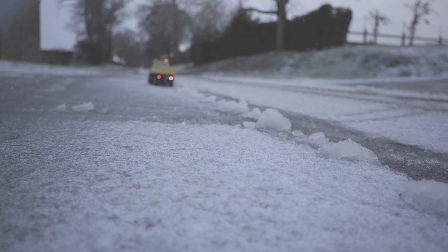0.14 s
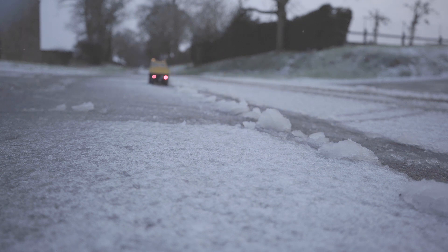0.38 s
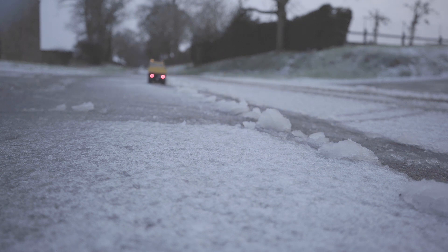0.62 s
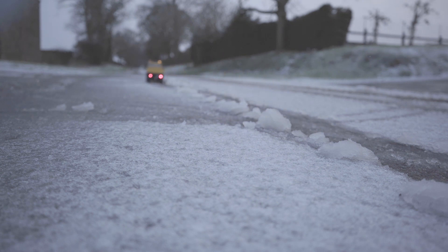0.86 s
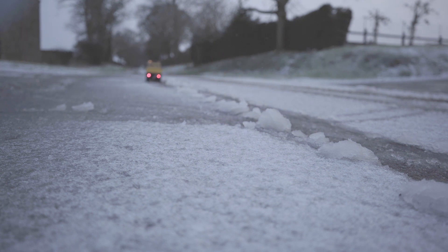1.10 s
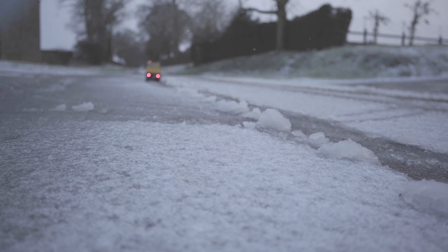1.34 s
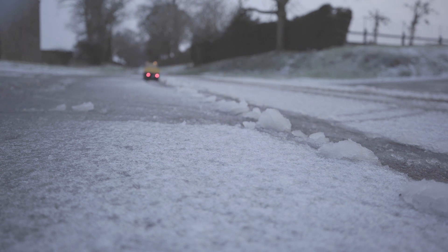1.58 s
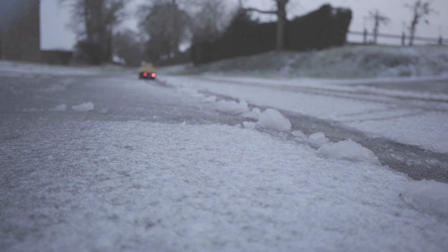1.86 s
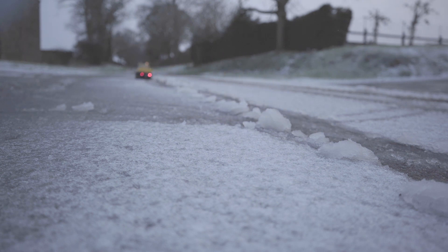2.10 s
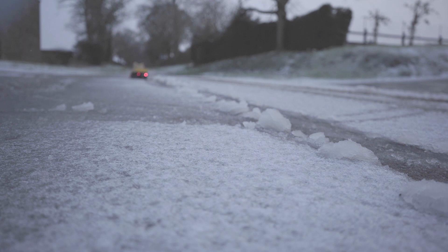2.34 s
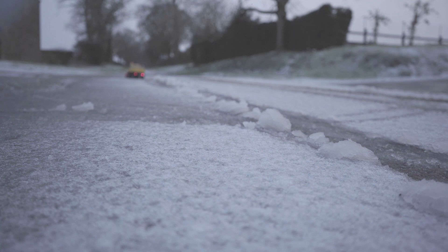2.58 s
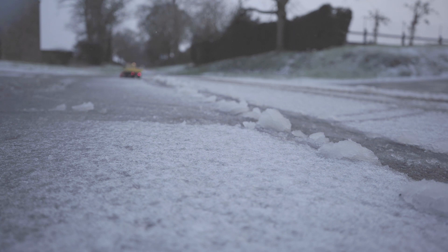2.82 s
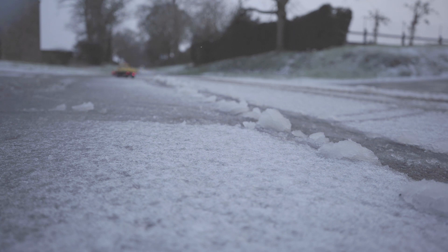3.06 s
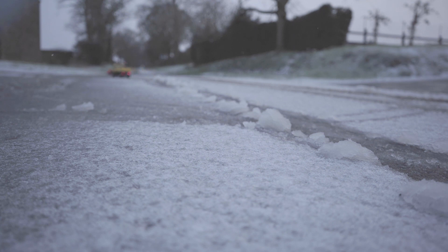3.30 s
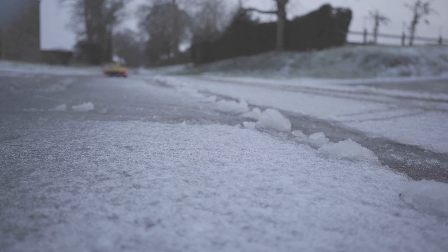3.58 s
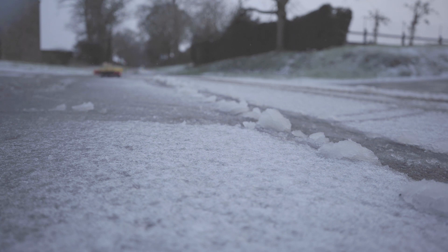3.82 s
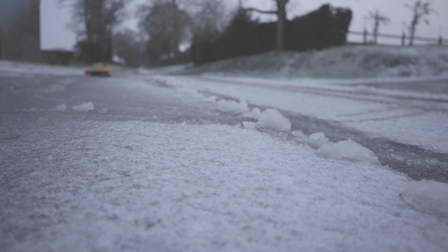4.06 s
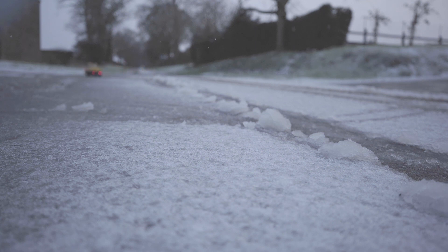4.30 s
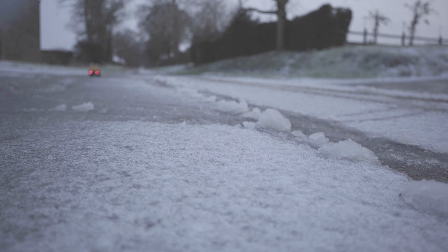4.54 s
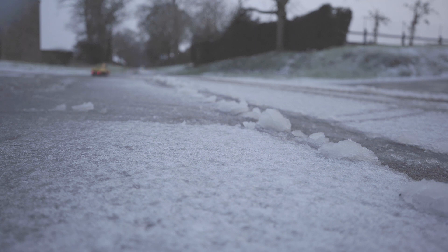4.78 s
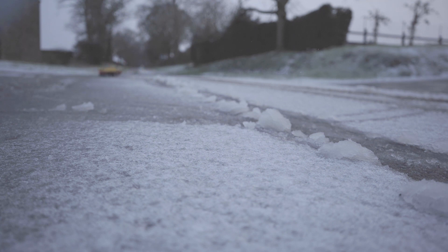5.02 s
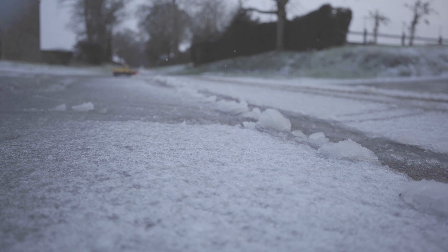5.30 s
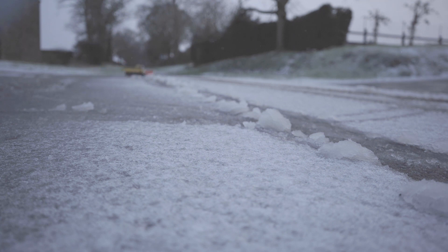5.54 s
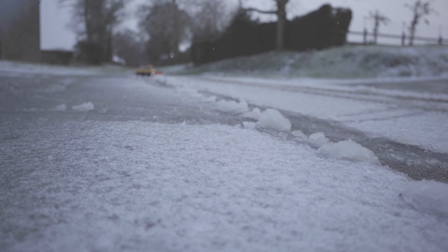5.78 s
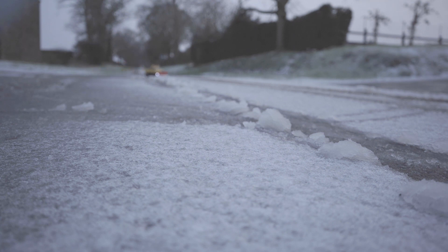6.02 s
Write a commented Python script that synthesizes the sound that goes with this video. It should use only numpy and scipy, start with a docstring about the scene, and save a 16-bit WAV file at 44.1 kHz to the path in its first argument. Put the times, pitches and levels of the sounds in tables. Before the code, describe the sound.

At a snowy roadside, ground-level stereo microphones catch a small electric model truck driving away over a steady, soft hush of distant wind and road. At 0 s its gear whine and grainy plastic rattle are loudest; the tone climbs, briefly drops out near 0.2 s, and hard knocks hit between 0.1 and 0.75 s, with an ice tick at 0.2. From 1 to 2.2 s the whine is high and throbs around twenty times a second, quieter, with a knock at 1.6. Around 2.3 s pitch and level fall sharply, with a knock at 2.4; a short, rough, lower burst follows at 2.7-3.1, with a close tick. Near 3.4 s it almost stops, leaving hiss. From 3.6 s it revs up again, reaching its highest pitch about 4.3-4.6, then whirrs unevenly to 6 s, faint, rattly and metallic, slightly left before drifting right, with sparse ice ticks.

```python
"""A gear whine and plastic rattle: a small electric model truck drives off over crusted snow, brakes, turns
and speeds up again, left of a pair of microphones on the ground. Meshing teeth make a swept tone that throbs once
per shaft turn; grainy noise rings the plastic body, and decaying modes knock as the chassis meets lumps.
Ice grains tick nearby as short noise bursts, over a far hush of wind and road made of coloured noise."""
import sys
import numpy as np
from scipy import signal
from scipy.fft import rfft, irfft, next_fast_len
from scipy.io import wavfile
from scipy.ndimage import uniform_filter1d, map_coordinates

SR = 44100
rng = np.random.default_rng(int(sys.argv[2]) if len(sys.argv) > 2 else 0)


def wav_out(sig):
    """Save sig, one row per channel (or a flat mono array), as 16-bit PCM at SR to the path in sys.argv[1]."""
    wavfile.write(sys.argv[1], SR, np.round(np.clip(np.atleast_2d(sig).T, -1, 1) * 32767).astype(np.int16))


def nominal_scale(level):
    """Amplitude ratio for a level in decibels (scalar or array-like)."""
    x = np.asarray(level, float) / 20
    return 10 ** x


N = 270774

# resonances of the gearbox housing: (centre [Hz], width [Hz], level [dB])
GEARBOX_MODES = [(2720, 180, -5), (2930, 130, 0), (3150, 200, -3), (3380, 220, -5)]
# resonances of the motor can: (centre [Hz], width [Hz], level [dB])
MOTOR_CAN_MODES = [(3480, 200, -4), (3700, 110, -2), (3880, 110, 0), (4110, 130, -1), (4500, 350, -8)]


def along(points, hz):
    """Logarithmic frequency scale: (frequency [Hz], value) points are interpolated on it."""
    f, v = np.transpose(points)
    return np.interp(np.log(hz + 1), np.log(f + 1), v)


def curves(rows):
    """Slow control: each column after the time becomes a piecewise linear curve, one value per sample."""
    s, *columns = np.transpose(rows)
    return [np.interp(np.arange(N) / SR, s, column) for column in columns]


def swells(rows):
    """Superposition of Gaussian bumps (time [s], length between 1/e points [s], height)."""
    t = np.arange(N) / SR
    return sum(height * np.exp(-4 * ((t - s) / length) ** 2) for s, length, height in rows)


def unit(x):
    """Normalization to an rms of 1."""
    return x / np.sqrt(np.mean(x ** 2) + 1e-20)


def wobble(rate):
    """Band-limited fluctuation: a smooth curve through random knots, rate of them a second."""
    knots = rng.standard_normal(int(N * rate / SR) + 4)
    return map_coordinates(knots, [np.arange(N) * rate / SR])


def filtered(x, response):
    """Linear filtering: the spectrum is multiplied by a complex response of frequency."""
    m = next_fast_len(N + 8192)
    return irfft(rfft(x, m) * response(np.fft.rfftfreq(m, 1 / SR)), m)[..., :N]


def modes(table):
    """Modal superposition: damped resonators (centre [Hz], width [Hz], level [dB]) of alternating sign."""
    def response(f):
        total = 0
        for k, (centre, width, db) in enumerate(table):
            damping = 1j * f * width
            total = total + (-1) ** k * nominal_scale(db) * damping / (centre ** 2 - f ** 2 + damping)
        return total
    return response


def pair(a, b, alike):
    """Interchannel coherence: two unrelated sounds, mixed as mid and side to the likeness asked."""
    def weights(hz):
        turn = np.arccos(np.clip(along(alike, hz), 0, 1)) / 2
        return np.array([np.cos(turn), np.sin(turn)])
    mid, side = filtered(np.array([a, b]), weights)
    return np.array([mid + side, mid - side])


def grit(response, grain_db, grain_rate):
    """Amplitude-modulated noise: uneven grains in patches over pitch and time, coloured, stereo, rms 1."""
    # the truck's noise at the two microphones: (frequency [Hz], likeness [0-1])
    truck_alike = [(60, .93), (600, .9), (1400, .9), (2500, .84), (4000, .55), (7000, .44), (15000, .35)]
    grains = nominal_scale(grain_db * wobble(grain_rate)) * rng.standard_normal((2, N))
    z = signal.stft(grains, nperseg=1024)[2]
    patches = uniform_filter1d(rng.standard_normal(z.shape[1:]), size=4, axis=0)
    patches = uniform_filter1d(patches, size=5, axis=1)
    a, b = signal.istft(z * nominal_scale(1.84 * unit(patches)), nperseg=1024)[1][:, :N]
    return unit(filtered(pair(a, b, truck_alike), response))


def hush():
    """Diffuse-field noise: far wind and road, barely moving; a low breeze leans on the microphones."""
    # wind and road: (frequency [Hz], relative density [dB per Hz])
    air_colour = [(120, -47), (200, -21), (380, -12.5), (482, -15.5), (635, -4), (735, -8.5), (916, -9),
                  (1000, -7.5), (1120, -12.5), (5940, -22.5), (7010, -26), (16000, -47)]
    # breeze: (frequency [Hz], relative density [dB per Hz])
    breeze_colour = [(15, -50), (25, -26), (50, -8), (100, -7), (150, 0), (230, -11), (320, -48),
                     (500, -120)]
    # background at the two microphones: (frequency [Hz], likeness [0-1])
    far_alike = [(60, .93), (250, .96), (500, .93), (1500, .75), (3000, .6), (5000, .35), (15000, .15)]
    # gusts: (time [s], length [s], swell [dB])
    gusts = [(2.03, .15, 9), (2.5, 0.48, 4.5), (3.98, .08, 7)]
    air = filtered(pair(*rng.standard_normal((2, N)), far_alike), lambda f: nominal_scale(along(air_colour, f)))
    breeze = filtered(pair(*rng.standard_normal((2, N)), far_alike), lambda f: nominal_scale(along(breeze_colour, f)))
    air_db = -43.5 + 0.8 * wobble(2.5)
    breeze_db = -72 + swells(gusts) + 1.1 * wobble(10)
    return nominal_scale(air_db) * unit(air) + nominal_scale(breeze_db) * unit(breeze)


def ticks():
    """Impulsive fracture: ice grains crack close by, a few ms of bright noise, thinner for small grains."""
    # ice grains: (time [s], level [dB], left over right [dB], thinness [0-1])
    ice_grains = [(0.222, -22, -3, .6), (2.737, -26.5, -18, .5), (2.8065, -35, 3, .9),
                  (3.4491, -43, -12, .3), (4.1199, -30.5, -7, 0.7), (4.3203, -28.5, 11, .5),
                  (5.239, -28.5, -6, 0.5), (5.4091, -32, -12, .6), (5.8711, -34, -4, .4)]
    # colour of the cracks: (frequency [Hz], relative density [dB per Hz])
    ice_colour = [(2500, -60), (4000, -18), (5500, 5), (9900, 0.5), (12000, -8), (15000, -2), (16600, -13),
                  (17500, -60)]
    out, t = np.zeros((2, N + 512)), np.arange(256) / SR
    for s, db, pan_db, thin in ice_grains:
        # noise common to both sides plus noise of each side
        noise = rng.standard_normal(len(t)) + 1.2 * rng.standard_normal((2, len(t)))
        crack = nominal_scale(-60 * t / 0.0059) * noise  # falls 60 dB in 5.9 ms
        crack = crack - np.clip(thin, 0, 1) * np.roll(crack, 1, axis=1)  # differencing weakens the bass
        sides_db = db + np.array([[pan_db / 2], [-pan_db / 2]])
        out[:, round(s * SR):][:, :len(t)] += nominal_scale(sides_db) * crack
    return filtered(out[:, :N], lambda f: nominal_scale(along(ice_colour, f)))


def drive():
    """Gear kinematics: tooth rate, shaft turns, throb, whine and rattle levels as the wheels skip and bite."""
    # speed before any racing: (time [s], gear teeth meeting a second [Hz])
    tooth_rate = [(0, 1985), (.04, 2000), (.1, 2110), (.26, 2280), (.45, 2350), (.65, 2375), (.9, 2420),
                  (1.1, 2480), (1.3, 2420), (1.53, 2320), (1.8, 2420), (2.0, 2520), (2.2, 2560),
                  (2.34, 2300), (2.5, 1530), (2.64, 1340), (2.86, 1580), (2.91, 1740), (2.98, 1770),
                  (3.03, 1870), (3.12, 1740), (3.33, 820), (3.52, 930), (3.65, 970), (3.78, 1500),
                  (3.86, 1780), (3.89, 2030), (3.925, 2060), (4.0, 2310), (4.27, 2710), (4.55, 2740),
                  (4.75, 2610), (5.0, 2610), (5.25, 2450), (5.55, 2620), (5.72, 2510), (5.88, 2720),
                  (6.14, 2600)]
    # depth of the shaft's throb: (time [s], depth [relative])
    throb_depth = [(0, 0.15), (1.3, 1.9), (2.3, 1.6), (2.9, 1), (3.7, 1.25), (5, 1.54), (6.14, 1)]
    # throttle and distance together: (time [s], whine level [dB], body rattle level [dB])
    throttle = [(0, -25, -23), (.13, -39.5, -27.5), (.18, -46, -27.5), (.24, -35, -27.5), (.27, -26, -27.5),
                (.6, -28, -28.5), (1.2, -29, -32), (1.7, -31, -32.5), (2.15, -32, -31.5),
                (2.33, -37, -32.5), (2.41, -59, -34), (2.46, -64, -41.5), (2.62, -50, -40.5),
                (2.72, -41, -34.5), (2.95, -31.5, -33.5), (3.07, -35.5, -35), (3.16, -54, -37.5),
                (3.44, -71.5, -50.5), (3.55, -52, -37.5), (3.64, -42, -36.5), (3.7, -40, -36),
                (3.8, -35, -33.5), (3.97, -33, -35.5), (4.08, -44, -36), (4.6, -38, -36),
                (4.85, -39, -35.5), (5.35, -49, -36.5), (5.66, -40, -34.5), (6.14, -40.5, -34)]
    # the wheels skip over a bump and the drive goes slack: (time [s], length [s], rattle dip [dB])
    skips = [(.045, .03, 6.5), (.2, .04, 1.5), (.3, .015, 1.5), (.665, .03, 4), (.722, 0.018, 4),
             (.818, 0.012, 3), (.965, 0.023, 4), (1.065, 0.034, 5), (1.36, .04, 2.5), (1.555, 0.02, 3),
             (1.65, 0.023, 2.5), (1.82, 0.045, 2), (2.19, 0.029, 2.5), (2.36, 0.026, 3), (2.53, 0.022, 5),
             (2.7, 0.012, 3.5), (2.79, 0.049, 1.5), (2.885, 0.033, 4), (3.01, 0.033, 3), (3.085, 0.027, 2),
             (3.16, .04, 2), (3.31, 0.022, 10), (3.675, 0.038, 3), (3.85, 0.04, 2), (4.04, 0.017, 1.5),
             (4.32, .025, 0), (4.45, 0.019, 5.5), (4.685, 0.036, 4), (4.805, 0.045, 5), (4.895, 0.029, 6),
             (5.06, .04, 2.5), (5.15, .035, 3), (5.5, 0.024, 2), (5.6, 0.02, 1.5), (5.79, 0.12, 1),
             (5.9, .03, 1.5), (5.99, .03, -0.5)]
    # the wheels dig in and load the drive hard: (time [s], rattle swell [dB], whine swell [dB])
    bites = [(.015, -3.5, 2), (.115, 0, 12), (.995, -0.5, 4.5), (1.095, 3, 4), (1.6, 2.5, 1),
             (2.09, -1, 1.5), (2.22, -1.5, 3.5), (2.67, 1.5, 4), (2.75, 1.5, 11.5), (2.835, 2.5, 2),
             (2.96, 0, 5), (3.045, 3.5, 4), (3.28, 3, 0), (3.34, 7, 1), (3.61, 3, 10), (3.725, 4, 6.5),
             (3.78, 1.5, 9), (3.9, 2, 5.5), (3.98, 0.5, 0.5), (4.66, 0, 4), (4.76, 1.5, 6.5),
             (4.865, 3.5, 10.5), (4.96, 2.5, 8), (5.03, 2, 1), (5.11, 1, 1), (5.19, 2.5, 2), (5.29, 1.5, 1),
             (5.4, 1, -4), (5.555, 0.5, -3), (5.67, -1, 4), (5.845, 0.5, 4), (5.94, -1.5, 5),
             (6.03, 0, 7.5)]
    bite_s = 0.029
    teeth_per_turn, first_turn = 120, -0.07  # of the slightly bent drive shaft
    hz, = curves(tooth_rate)
    throb, = curves(throb_depth)
    turns = np.cumsum(hz) / SR / teeth_per_turn + first_turn
    whine_db, body_db = curves(throttle)
    skip_db = swells(skips)
    # the whine dips deeper than the rattle
    whine_db = whine_db - 2.4 * skip_db + swells([(s, bite_s, db) for s, _, db in bites])
    body_db = body_db - skip_db + swells([(s, bite_s, db) for s, db, _ in bites])
    # freed wheels race ahead 12 ms late, more at speed, then are dragged back
    t = np.arange(SR // 4) / SR - 0.012
    drag = (t > 0) * np.exp(-t / 0.022)
    late_skip = signal.fftconvolve(skip_db, drag / drag.sum())[:N]
    race = 0.013 * np.clip(hz / 2400, 0, 1) ** 2 * late_skip
    race = race - uniform_filter1d(race, size=SR // 6)  # keeps the mean speed
    return hz * (1 + race), turns, throb, whine_db, body_db


def knocks():
    """Impact excitation of modes: each lump strikes the chassis, which chatters back twice within 10 ms."""
    # chassis modes: (frequency [Hz], level [dB], 60 dB decay time [s])
    chassis_modes = [(567, -7.5, 0.017), (823, -2.5, 0.013), (1345, 0.5, 0.011), (1715, -5.5, 0.016),
                     (2160, -1, 0.0083), (3300, -14, .004)]
    # lumps struck: (time [s], level [dB])
    lumps = [(0.1111, -7), (0.2779, -9.5), (0.317, -8.5), (.354, -10.5), (0.5406, -2), (0.7425, -5.5),
             (1.28, -17), (1.613, -8), (1.843, -15.5), (2.4113, -6.5), (3.29, -32), (3.33, -34),
             (3.36, -32), (5.108, -31)]
    contacts = [(0, 0), (0.0032, -14), (0.006, -6.5)]  # (delay [s], level [dB])
    out, t = np.zeros(N + 2048), np.arange(1024) / SR
    for (s, db), chance in zip(lumps, rng.standard_normal((len(lumps), 9))):
        ring = 0
        for (hz, mode_db, t60), c in zip(chassis_modes, chance):
            ring = ring + nominal_scale(mode_db + 0.32 * c - 60 * t / t60) * np.sin(2 * np.pi * hz * t)
        ring = ring * np.clip(t / 0.0011, 0, 1)  # the snow cushions the contact
        for (late, less_db), c in zip(contacts, chance[6:]):
            start = round((s + late * (1 + 0.086 * c)) * SR)
            out[start:start + len(t)] += nominal_scale(db + less_db) * ring
    return filtered(out[:N], modes([(1360, 800, 0)]))


def rattle(load, body_db):
    """Noise-excited resonance: loose gear play rings the plastic and metal; tyres crunch and throw spray."""
    # plastic body: (centre [Hz], width [Hz], level [dB])
    body_modes = [(460, 171, -7), (636, 540, -9), (982, 357, -6.5), (1296, 211, -2), (1805, 545, -4),
                  (2540, 406, -2.5)]
    # hollow cab: (centre [Hz], width [Hz], level [dB])
    cab_modes = [(1480, 90, 0), (1660, 90, -2)]
    # crunch of the crust: (frequency [Hz], relative density [dB per Hz])
    crunch_colour = [(2530, -56), (4300, -5), (5010, 2), (5300, -0.5), (7410, -2), (8350, -7.5),
                     (9500, -14), (12400, -24), (20900, -120)]
    # thrown crystals: (frequency [Hz], relative density [dB per Hz])
    spray_colour = [(5290, -37), (9000, 2), (12500, 4), (13600, -1), (15850, -1), (16100, -30)]
    # as the truck turns different sides to the listener, levels over the body:
    # (time [s], cab [dB], gearbox [dB], motor can [dB], tyres [dB], spray [dB])
    facing = [(0, -7, -8, -6, -10, -17.5), (.5, -3.5, -3.5, -3.5, -8.5, -17), (1.2, -2, -2, -4, -7.5, -14),
              (2.3, -6.5, -4.5, -3.5, -10.5, -17), (2.6, -7, -7.5, -7, -13, -25),
              (2.8, 2, -1, -5, -13, -23), (3.05, -11.5, -1, -5, -9, -21), (3.4, -23, -6, -9.5, -16.5, -26),
              (3.75, -10, -2, -4, -12, -27), (4.1, -9, -0.5, 5.5, -4, -16.5), (4.45, 0, -4, -4, -6, -19),
              (4.65, -2, -2.5, -2.5, -6, -20), (4.75, 5.5, -3.5, -2.5, -6, -20),
              (4.9, -4.5, -4, -4.5, -8.5, -20), (5.1, -1, -1, -0.5, -7, -20.5),
              (5.25, -7.5, 3.5, 3, -9.5, -22), (5.42, -7, 0.5, 6, -10.5, -21.5),
              (5.6, -14, -4.5, 3, -11, -22), (6.14, -10, -2, -8.5, -16, -20)]

    def ringing(part, centre, width):
        """Cascaded resonance: the part's modes under one broad resonance (centre [Hz], width [Hz])."""
        return lambda f: modes(part)(f) * modes([(centre, width, 0)])(f)

    cab_db, gearbox_db, can_db, tyres_db, spray_db = body_db + np.array(curves(facing))
    shake_db = 0.76 * load + 0.43 * wobble(28)  # small bumps shake all parts together
    snow_shake_db = 0.88 * shake_db
    body = nominal_scale(body_db + shake_db) * grit(ringing(body_modes, 1400, 2500), 0.77, 250)
    cab = nominal_scale(cab_db + shake_db) * grit(ringing(cab_modes, 1560, 700), 1.3, 200)
    gearbox = nominal_scale(gearbox_db + shake_db) * grit(ringing(GEARBOX_MODES, 2950, 1500), 2.0, 300)
    can = nominal_scale(can_db + shake_db) * grit(ringing(MOTOR_CAN_MODES, 3900, 1500), 2.75, 300)
    tyres = nominal_scale(tyres_db + snow_shake_db) * grit(lambda f: nominal_scale(along(crunch_colour, f)), 1.04, 400)
    spray = nominal_scale(spray_db + snow_shake_db) * grit(lambda f: nominal_scale(along(spray_colour, f)), 1.8, 400)
    return body + cab + gearbox + can + tyres + spray


def whine(hz, turns, throb, tone_db, load):
    """Gear-mesh tone, modulated: once per shaft turn it jumps ahead, loses contact a moment and sags again."""
    angle = 2 * np.pi * (turns + 0.45)
    sag = np.sin(angle) + np.sin(2 * angle) / 2 + np.sin(3 * angle) / 3
    hz = hz * (1 + 0.0105 * throb * (1 + 0.4 * wobble(12)) * sag + 0.003 * wobble(50))
    phase = 2 * np.pi * np.cumsum(hz) / SR
    lost_contact = np.exp(4 * (np.cos(angle) - 1))
    slack_db = -2.5 * throb * np.clip(1 + 1.8 * wobble(15), 0, 3) * lost_contact
    mesh = unit(nominal_scale(slack_db + 0.34 * load + 1.1 * wobble(40) + 1.1 * wobble(160)))
    # the octave is heard where it meets a housing resonance
    octave = nominal_scale(-8.0) * np.abs(modes(GEARBOX_MODES + MOTOR_CAN_MODES)(2 * hz))
    return np.sqrt(2) * mesh * nominal_scale(tone_db) * (np.sin(phase) + octave * np.sin(2 * phase))


def scene():
    """Interaural-type cues: phase and level differences place the truck and the hush; ticks have their own."""
    # the truck drifts across the road: (time [s], left over right [dB])
    leftward = [(0, 0.2), (3.2, 0.4), (3.7, 1.5), (5.2, 1.9), (6.14, -1.8)]
    # lead of the left microphone: (frequency [Hz], phase [rad])
    left_lead = [(300, 0), (1200, 0.46), (2100, 0.81), (2900, 1.09), (3800, 2), (4700, 4), (6500, 3),
                 (12000, 4.5), (15000, 4.5)]
    # level difference of the microphones: (frequency [Hz], left over right [dB])
    left_louder = [(60, -1), (110, 0.0), (200, -0.5), (380, -0.5), (700, -1.5), (1290, 0.5), (2380, 4.5),
                   (4400, 3.5), (8120, 1.5), (15000, 9)]

    def ears(f):
        """Half of each difference goes to either side, with opposite signs."""
        return np.array([nominal_scale(s * along(left_louder, f)) * np.exp(1j * s * along(left_lead, f))
                         for s in (0.5, -0.5)])

    hz, turns, throb, whine_db, body_db = drive()
    load = throb * np.cos(2 * np.pi * turns)
    drift = nominal_scale(np.outer([0.5, -0.5], curves(leftward)[0]))
    truck = drift * (whine(hz, turns, throb, whine_db, load) + knocks() + rattle(load, body_db))
    return filtered(truck + hush(), ears) + ticks()


def roll_off(x):
    """The treble ends steeply here."""
    return signal.sosfilt(signal.butter(12, 15890, fs=SR, output="sos"), x)


def record(dry):
    """Unity gain: the microphone pair's mix is passed on at its own level."""
    return roll_off(dry)


dry = scene()
out = record(dry)
wav_out(out)
```